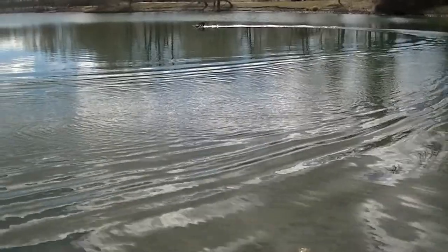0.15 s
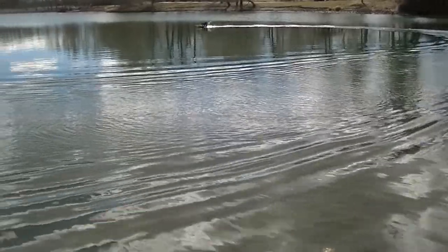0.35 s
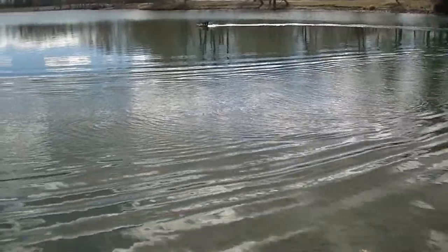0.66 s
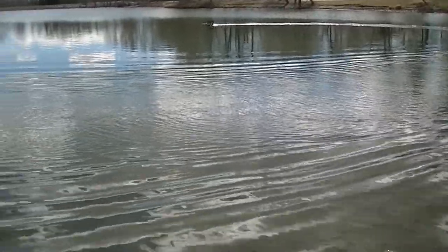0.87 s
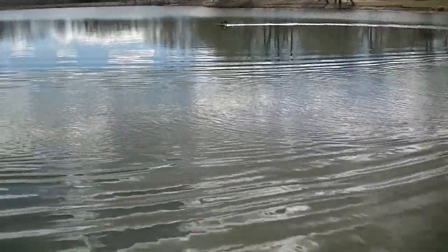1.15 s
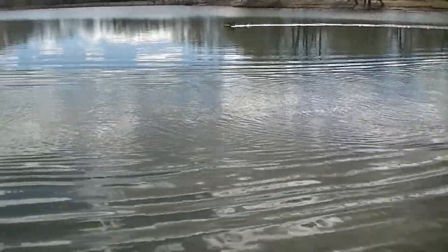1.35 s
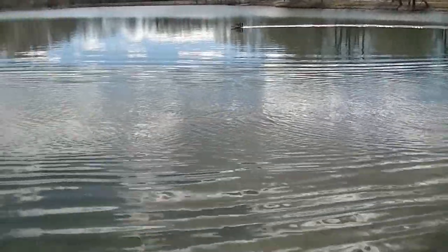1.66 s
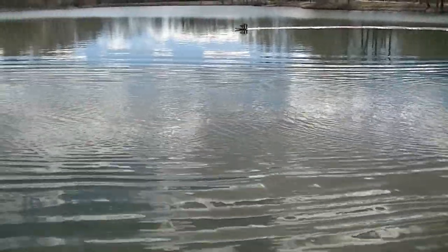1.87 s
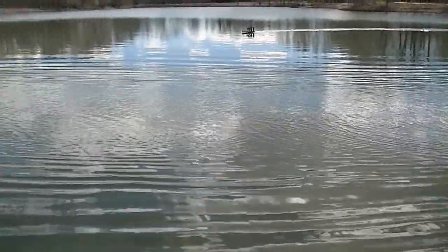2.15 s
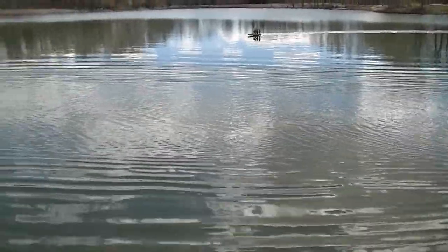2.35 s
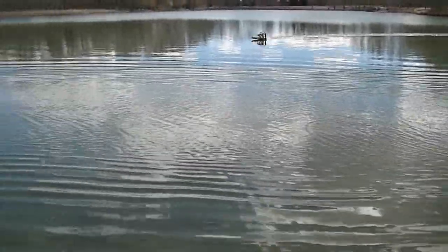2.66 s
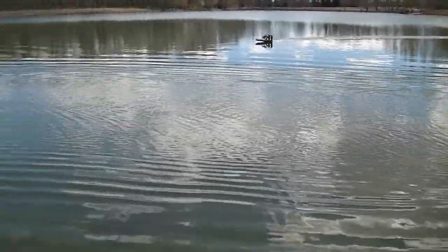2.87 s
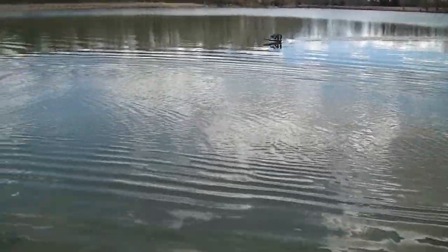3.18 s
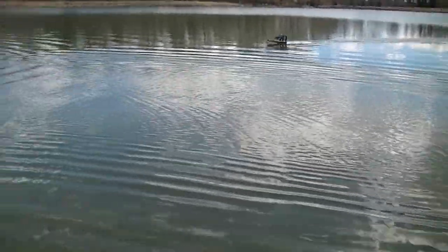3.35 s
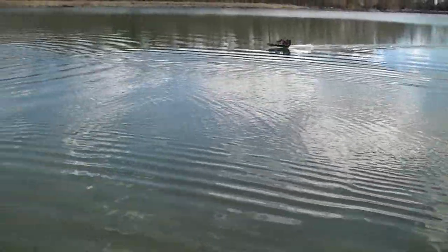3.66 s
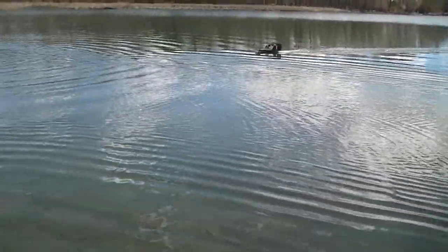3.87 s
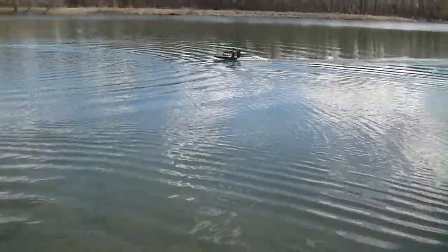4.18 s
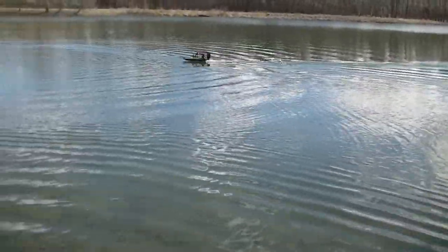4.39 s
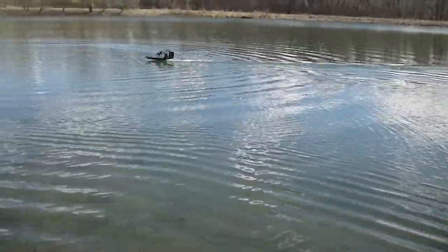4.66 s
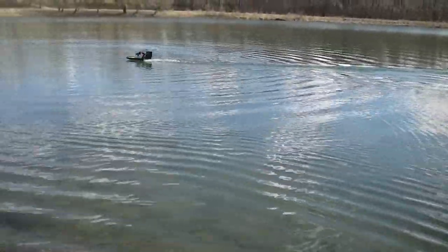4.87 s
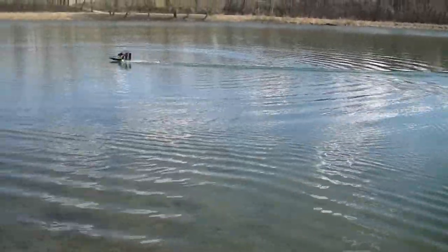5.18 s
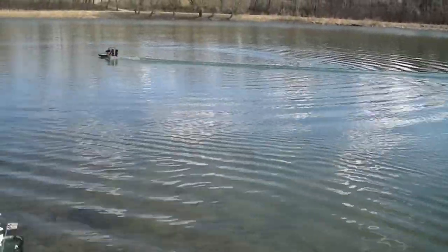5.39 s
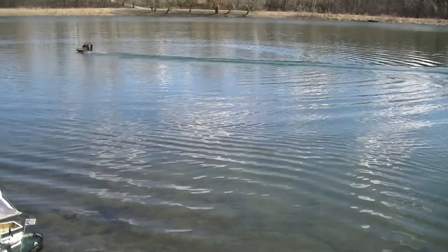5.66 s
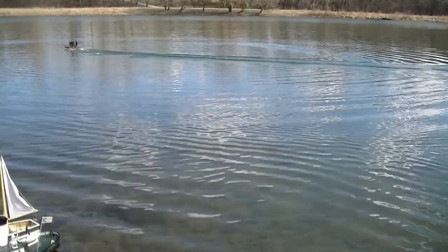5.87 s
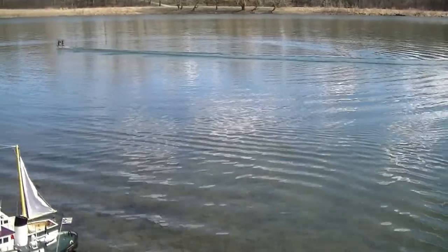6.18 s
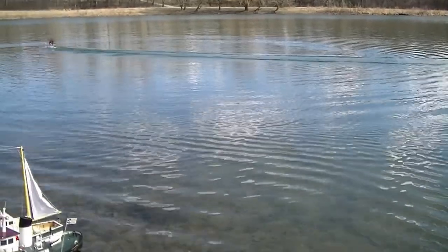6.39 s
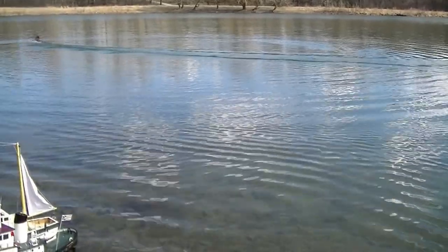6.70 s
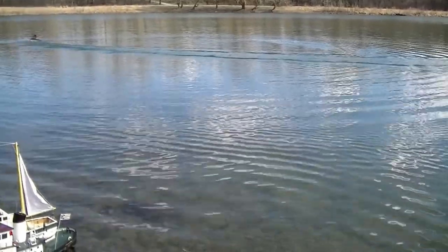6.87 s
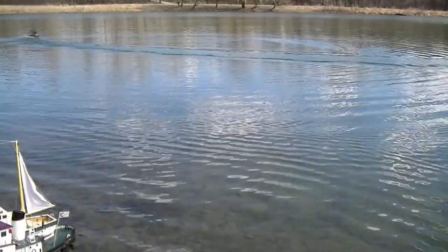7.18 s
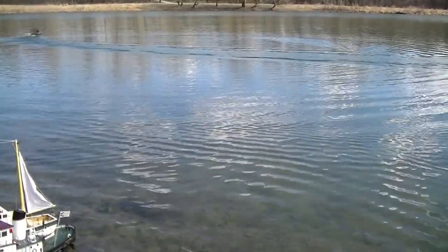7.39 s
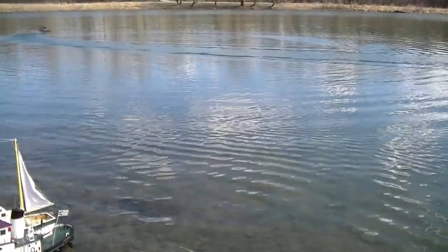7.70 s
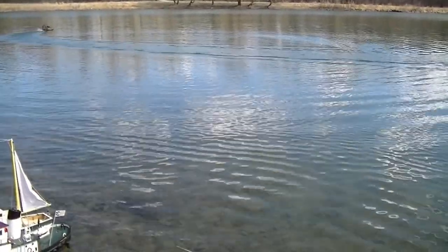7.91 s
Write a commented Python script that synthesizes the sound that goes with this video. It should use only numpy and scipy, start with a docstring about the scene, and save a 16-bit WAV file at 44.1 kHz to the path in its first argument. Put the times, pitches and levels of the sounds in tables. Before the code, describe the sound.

Raspy propeller buzz of a model airboat climbs, holds at full throttle, drops suddenly with watery slaps and ticks, then recedes across a quiet pond.

```python
"""Three-bladed air propeller of a small electric airboat circling a pond: blade tones, shaft orders, rush of air.
The boat speeds up, throttles back near the shore and runs away. Tones are drifting partials locked to the shaft.
Around them: magnet whine, the speed controller's whistle, spray as the hull slaps ripples, sharp water ticks.
Behind: low outdoor rumble and two raspy chirps. Heard by a narrow microphone pair.
"""
import sys
import numpy as np
from scipy import signal
from scipy.fft import rfft, irfft, next_fast_len
from scipy.io import wavfile
from scipy.ndimage import uniform_filter1d

SR = 44100
rng = np.random.default_rng(int(sys.argv[2]) if len(sys.argv) > 2 else 0)


def put_to_file(sound):
    """Save the sound as 16-bit audio at rate SR, in the file named by the first command-line argument."""
    columns = np.atleast_2d(sound).T  # one column per channel
    safe = np.clip(columns, -1, 1)
    whole_steps = np.round(safe * 32767)
    wavfile.write(sys.argv[1], SR, whole_steps.astype(np.int16))


N = 354563
TIME_S = np.arange(N) / SR
SLOW_STEP = 64  # samples between slow control points
SLOW_S = np.arange(0, N + 128, SLOW_STEP) / SR

BLADES, MAGNETS = 3, 14
FULL_THROTTLE_HZ, PART_THROTTLE_HZ = 184, 150  # shaft speeds
# Shaft speed. Each row: time in seconds, speed in Hz.
SHAFT_SPEED = [(0.0, 156.8), (0.6, 157.4), (0.82, 157.3), (1.0, 165.7), (1.23, 180.2), (1.39, 183.6),
               (1.66, 184.1), (2.44, 183.9), (2.87, 184.8), (3.58, 185.0), (3.608, 182.6), (3.638, 175.7),
               (3.712, 155.5), (3.822, 137.4), (3.894, 131.1), (4.0, 129.8), (4.12, 137.4), (4.21, 141.6),
               (4.34, 143.8), (4.45, 139.6), (4.63, 136.8), (4.95, 136.4), (5.1, 138.6), (5.31, 139.9),
               (5.6, 137.0), (6.05, 136.9), (6.63, 138.3), (7.48, 138.3), (7.8, 136.6), (8.04, 134.7)]
# Base levels at the shore as the boat turns. Each row: time in seconds, blade tones 1, 2, 3, 4, 8 and 11 in dB,
# shaking of the hull in dB.
BLADE_TONES = [(0.0, -43, -28, -44, -38.5, -51, -62, -39.5),
               (0.5, -44.5, -29, -34.5, -35.5, -52, -64, -39.5),
               (0.9, -41, -28.5, -34, -37.5, -43, -61, -38.5),
               (1.15, -36.5, -28, -29.5, -32, -39, -55, -44),
               (1.4, -31, -25.5, -25.5, -29.5, -46.5, -64, -36.5),
               (1.9, -34, -28.5, -27, -30.5, -44.5, -64, -32.5),
               (2.4, -33, -32, -24, -33.5, -46.5, -64, -33.5),
               (2.62, -32, -29, -28.5, -33, -44, -58, -31.5),
               (2.8, -34, -24.5, -35.5, -28, -44.5, -76, -30.5),
               (3.25, -32.5, -25, -33.5, -29.5, -46.5, -73, -33),
               (3.52, -35, -20.5, -34, -30.5, -47, -66, -30.5),
               (3.6, -33, -22.5, -32, -30, -40, -71, -29.5), (3.66, -33, -27, -40, -33, -57, -75, -40.5),
               (3.74, -31, -25.5, -41, -38, -43, -53, -28.5), (3.8, -42, -26, -35, -35.5, -49, -53, -49),
               (3.98, -41.5, -28, -37, -34, -52.5, -70, -52),
               (4.35, -39.5, -21.5, -36.5, -32, -51, -53, -48),
               (4.75, -42, -27.5, -32.5, -38.5, -47, -52, -48),
               (5.0, -39, -29.5, -27, -38.5, -48.5, -52.5, -50),
               (5.13, -37.5, -38, -31.5, -36.5, -44, -53.5, -44.5),
               (5.6, -44.5, -36, -30.5, -36.5, -42.5, -50, -46.5),
               (6.1, -48.5, -36, -34.5, -34, -43.5, -57, -50), (6.5, -48, -35.5, -42.5, -40, -50, -63, -48),
               (6.9, -53, -43.5, -44, -53, -54.5, -71, -57),
               (7.3, -48, -43, -44.5, -46.5, -56.5, -71, -47.5),
               (7.7, -47, -41, -38, -43.5, -49.5, -55, -51.5),
               (8.04, -49.5, -41.5, -40, -44.5, -51, -63, -59)]
# Offsets of blade tones 4 to 14 from the line through tones 4, 8 and 11, in dB.
UPPER_TONE_OFFSETS_DB = [0, 0, -0.5, 1.5, 2.5, 2, 6, 5.5, 1, -4, -3]
# Unequal blades and a shaking mount. Each row: shaft order, level in dB against the base of its order group
# (order 2, 4, 5, 7 or 10; from order 11 up, the rush of air).
SHAFT_ORDERS = [(1, -26), (2, -0.5), (4, -2.5), (5, 0.5), (7, -0.5), (8, -7.5), (10, 0), (11, -22.5),
                (13, -13.5), (14, -15.5), (16, -18.5), (17, -23), (19, -14.5), (20, -25), (22, -16.5),
                (23, -23), (25, -26.5), (26, -27), (29, -23.5), (31, -32), (32, -28), (34, -33), (35, -37),
                (37, -45)]
# Bases of shaft orders 2, 4, 5, 7 and 10 against the shaking. Each row: part throttle in dB, full throttle in dB.
SHAKE_BASES = [(-14, -9), (2, -0.5), (-3.5, -2), (-1, -1.5), (-9, -14.5)]
# Single partials stand out or sink. Each row: centre in seconds, shaft order, change in dB, half length in seconds.
GLINTS = [(.1, 10, 12, 0.67), (0.19, 6, -3.5, 0.068), (0.392, 6, 1, 0.049), (0.68, 9, 5, 0.071),
          (.77, 6, -3.5, 0.063), (0.97, 9, 5, 0.056), (6.3, 6, -3, 0.12), (6.5, 15, 4.5, .08),
          (8.5, 12, 3, .08), (6.9, 12, 8, 0.099), (7.286, 9, 5, 0.084), (0.81, 27, 5, 0.2),
          (0.75, 18, 5.5, 0.11), (1.38, 7, 6.5, 0.26), (2.2, 18, 5, 0.16), (2.63, 18, 4, 0.24),
          (3.17, 15, 4.5, 0.19), (3.54, 15, -7, .15), (2.43, 15, -1.5, .15), (2.84, 15, -1, .08),
          (3.04, 14, 8, 0.51), (2.63, 16, 11, .2), (3.1, 16, 8, .25), (3, 11, 11, .25),
          (3.29, 12, -7, 0.051), (3.8, 12, 4, .06), (2.95, 12, 5, 0.064), (1, 18, -1.5, 0.14),
          (1.13, 21, -2, .12), (1.65, 21, -7, 0.23), (1.2, 27, -10, .1), (2.4, 24, -7, .25),
          (0.45, 1, 5.5, 0.71), (3.76, 15, 6, .05), (3.7, 7, -6, .1), (3.78, 8, -6, .08), (3.76, 9, -4, .1),
          (4, 5, 4, .05), (3.75, 10, 3.5, .1), (3.3, 13, 4, .06), (4.27, 4, 6.5, .3), (4.4, 7, 7, 0.33),
          (5.1, 10, 12, 0.54), (5.7, 10, 2, .3), (2.43, 8, 3.5, 0.38), (7.1, 8, 8, 0.97), (7.7, 4, -8, .5),
          (6.06, 4, -6, 0.44), (3.1, 5, 2.5, .4), (1.7, 13, -5, .3), (8, 15, 1.5, .4), (4.3, 13, 9.5, 0.63),
          (3.1, 13, -1, 0.32), (2.3, 13, -13, 0.47), (1.7, 14, 9, .35), (6.3, 14, -12, 1.2),
          (3, 23, 5, 0.82), (2.6, 25, 8, .8), (2.5, 17, 4, .8), (4.7, 22, -6, 1.4), (.4, 19, -7, .5),
          (5.0, 19, -5, .5), (3.95, 24, 8, .15), (1.15, 24, -3, .2), (0.92, 30, -2, .25),
          (1.1, 33, -1, .25), (1.1, 36, -5, .25), (2.5, 30, -1, .25), (7.1, 30, -6, .55), (1.82, 29, 7, .1),
          (1.96, 27, 4, .2), (3, 7, -10, .07), (3, 4, -5, 0.027), (4, 5, -7, .02), (3.7, 4, 5.5, 0.035),
          (3.56, 9, -8, .04), (3.67, 10, 6, .06), (3.5, 15, 2.5, .06), (3.02, 12, -4, 0.49),
          (3.53, 10, 11.5, 0.16), (4.347, 15, 4.5, 0.1), (4.82, 24, 10, .07), (5.03, 24, 8, .12),
          (5.66, 24, 3, 0.17), (5.86, 24, -3, .06), (5.48, 12, 6, 0.31), (0.11, 15, 9, .1), (.13, 5, 1, .1),
          (2, 5, 1, .1), (3.273, 5, 4.5, 0.082), (5.525, 9, 3.5, 0.086), (6.034, 9, 5.5, 0.052),
          (4.973, 15, -18, 0.15), (5.2, 18, -8, 0.11), (5.18, 18, 6.5, 0.23), (5.76, 18, -3, 0.034),
          (5.76, 21, 0, 0.037), (4.71, 21, -6, .04), (4.7, 21, 4, .1), (5.14, 27, -7, .12),
          (6.7, 27, 4, .06), (5.52, 30, -7, .06), (5.76, 30, -9, .04), (5.4, 30, 8, 0.07),
          (3.8, 15, 1.5, 0.11), (6.04, 15, -5, .04), (5.3, 30, 5.5, 0.14), (5.643, 18, 9, 0.049),
          (5.622, 21, 7.5, 0.1), (5.888, 18, 9.5, 0.074), (5.9, 21, 3.5, 0.11), (5.9, 27, 5, .07),
          (6.047, 24, 2.5, 0.083), (6.17, 15, 1.5, 0.046), (6.742, 9, 8.5, 0.051), (6.4, 9, 4.5, 0.063),
          (7.15, 12, 5.5, 0.17), (7.648, 27, 7.5, 0.22), (6.6, 27, -7, .12), (6.56, 18, -9, 0.13),
          (7.85, 21, -2, .08), (6.2, 9, -6, .04), (5.8, 12, -8, .04), (7.43, 6, -6, .04),
          (6.73, 15, 3, .06), (7.44, 27, 8, .05)]
GLINT_STEEPNESS = 3
# Blade pulse points down from ahead of the propeller, up from behind. Each row: time in seconds, phase in radians.
FACING = [(0, 2.), (1.2, 1.), (3.8, 1.), (4.4, 2.2), (5.7, 4.), (6.8, 2.7), (8.04, 3.4)]
# Higher blade tones lead; every phase drifts slowly.
LEAD_RAD_PER_TONE_SQ, DRIFT_RAD, DRIFT_HZ = .3, .35, .6
# Slow level drift of partials as the hull rocks, before throttle and distance act on it.
FADE_DB, FADE_PER_ORDER_DB, FADE_TOP_DB, FADE_HZ = .2, .06, 2., 5
# Extra drift of the blade tones far off. Each row: time in seconds, added drift in dB.
FAR_FADE = [(5.9, 0), (6.4, 1.)]
# Upper tones weaken while the shaft changes speed: dB per blade tone above 4 at most, speed change that nears it.
BLUR_TOP_DB, BLUR_HZ_PER_S = .9, 40
SMEAR_PER_BLUR_DB = .7  # added share of blade-tone phase waver
CALM_SHARE = .2  # share of flutter that low partials lose at full throttle
WHINE_DB = -22.5  # magnet whine against the rush
# Whine swells as the motor surges. Each row: centre in seconds, level in dB, half length in seconds.
WHINE_SWELLS = [(4.33, -36, 0.15), (5.31, -40, 0.12), (6.9, -56, 0.27)]

# Hull bobs over ripples and the sound dips. Each row: centre in seconds, depth in dB before each sound's own share.
BOBS = [(.22, 3), (.53, 2.5), (.8, 2.5), (3.04, 0.5), (3.46, 1), (4.5, 0.5), (4.64, 1.5), (4.93, 0),
        (5.17, 1), (5.45, 3.5), (5.72, 1), (6.02, 1), (6.28, 2), (6.57, 2.5)]
# The shaking dips and the low rush puffs just after, by these shares of the depth.
BOB_HALF_S, BOB_LAG_S, BOB_SHAKE_SHARE, BOB_PUFF_SHARE = 0.049, 0.029, 2.1, 1.07

# Air through the propeller, base levels. Each row: time in seconds, middle range in dB, low range in dB, treble in dB.
RUSH_LEVELS = [(0.0, -34.5, -37.5, -53), (0.5, -33, -36.5, -52), (0.85, -33.5, -37.5, -48),
               (1.1, -35, -43, -46.5), (1.3, -31, -37.5, -44.5), (1.8, -30.5, -37, -46),
               (2.6, -31, -38.5, -42), (3.1, -29.5, -33.5, -41.5), (3.4, -31.5, -53, -40),
               (3.58, -31.5, -27, -43), (3.67, -38.5, -33, -47.5), (3.78, -38, -36, -49),
               (3.95, -40, -41, -52.5), (4.1, -34, -36, -50), (4.4, -36.5, -32.5, -47),
               (4.85, -33.5, -36, -44), (5.35, -31, -37, -43), (5.9, -32.5, -40, -45.5),
               (6.3, -36.5, -40, -48.5), (6.6, -39, -42, -55.5), (6.8, -43.5, -38.5, -69),
               (7.25, -42.5, -41, -70.5), (7.5, -39.5, -41, -52.5), (7.75, -39.5, -39, -51.5),
               (8.04, -40.5, -41.5, -54.5)]
# Spectrum of the rush, relative within each range. Each row: frequency in Hz, density in dB per Hz.
RUSH_COLOUR = [(100, -42), (200, -31), (300, -55), (420, -10.5), (700, -4.5), (1000, -5), (1250, -7),
               (1500, -9.5), (2000, -10.5), (3200, -10), (4500, -13.5), (6000, -21), (8000, -27),
               (11000, -30), (13000, -43), (14800, -49)]

# Switching whistle at part throttle. Each row: time in seconds, base level in dB.
WHISTLE_LEVEL = [(0, -65), (.15, -57), (.3, -70), (.9, -70), (1.2, -92), (3.6, -93), (3.66, -60),
                 (3.9, -52.5), (4.1, -55), (4.28, -58), (4.38, -55), (4.46, -67), (4.55, -58), (4.75, -49),
                 (4.86, -59), (4.96, -51), (5.06, -70), (5.2, -49), (5.42, -56), (5.5, -70), (5.63, -54),
                 (5.74, -66), (5.85, -52), (5.95, -57), (6.02, -72), (6.6, -65), (6.75, -86), (7.2, -78),
                 (7.4, -64), (8.04, -56)]
# Switching rate. Each row: time in seconds, frequency in Hz.
WHISTLE_PITCH = [(0, 8012), (1, 8030), (3.6, 8115), (3.9, 8078), (4.8, 7952), (5.4, 7903), (6.6, 7864),
                 (7.4, 7868), (8.04, 7890)]
# Side tone, heard while the boat is side-on. Each row: time in seconds, base level in dB.
SIDE_TONE_LEVEL = [(3.7, -95), (3.85, -72), (4.1, -66), (4.3, -64), (4.74, -69), (4.84, -95)]

# Hull slaps a ripple and throws spray. Each row: centre in seconds, rms level in dB before the bass cut,
# centre frequency in Hz, half length in seconds.
SLAPS = [(2.877, -23.5, 1250, 0.039), (2.912, -25.5, 870, 0.054), (3.103, -25.5, 1050, 0.057),
         (3.342, -24, 1030, 0.075), (3.615, -22, 1030, 0.064), (3.762, -27.5, 1180, 0.072),
         (4.029, -42.5, 4200, 0.024), (4.182, -28, 890, 0.044), (4.252, -28, 625, 0.037),
         (4.326, -27.5, 1550, 0.064), (4.595, -28, 2160, 0.032)]
# Sharp ticks of water on the hull. Each row: start in seconds, peak in dB before filtering, pitch in Hz,
# cycles (the swing peaks after half of them).
TICKS = [(3.80472, -6, 2200, .65), (3.80478, -22, 8000, .8), (3.8068, -24, 5000, 1.2),
         (3.8077, -19, 2200, 1), (4.092, -21, 4800, 1.5), (4.307, -26, 6000, 1.5), (4.5825, -18, 2000, 2.5),
         (4.5855, -32, 9500, 1.5), (4.587, -9.5, 2800, 1.2), (4.5972, -13, 2200, 2.4),
         (4.598, -32, 8500, 1.2), (4.6655, -23, 5000, .8), (4.7148, -18.5, 6000, .9)]
TICK_LOW_HZ, TICK_TOP_HZ = 350., 13500

# Quiet outdoor rumble, relative spectrum. Each row: frequency in Hz, density in dB per Hz.
POND_COLOUR = [(20, -25), (60, -20), (100, -17), (130, -5), (170, 2.5), (250, 7), (330, 14), (450, -5),
               (700, -29)]
POND_DB = -59
# Raspy chirps, perhaps a far bird. Each row: centre in seconds, level in dB before throb and fade,
# centre frequency in Hz, half length in seconds.
CHIRPS = [(7.69, -41, 2950, .045), (7.76, -42, 2950, .028)]
CHIRP_WIDTH_HZ, CHIRP_PULSE_HZ = 300, 85

# Boat position. Each row: time in seconds, left minus right in dB where the pan acts fully.
PAN = [(0.0, 2.5), (3.13, 2), (6.14, 3.5), (8.04, 3.5)]
# How far the pan acts. Each row: frequency in Hz, share of the pan.
PAN_SHARE = [(300, 0.), (900, 0.24), (1800, 0.83), (3600, 0.82), (7000, 1.), (8600, 0.13), (9200, 0.041)]
RECORDER_TOP_HZ = 14800


def propeller():
    """Blade-rate harmonics, weaker shaft orders from unequal blades, magnet whine; returns sound and shaft turns."""
    hz = curves(SHAFT_SPEED, SLOW_S)[0]
    jittered_hz = hz * (1 + wander((.0005, 8)))
    turns = np.cumsum(np.interp(TIME_S, SLOW_S, jittered_hz)) / SR
    throttle = np.clip((hz - PART_THROTTLE_HZ) / (FULL_THROTTLE_HZ - PART_THROTTLE_HZ), 0, 1)
    calm = 1 - CALM_SHARE * throttle
    speed_change = uniform_filter1d(abs(np.gradient(hz, SLOW_S)), size=40)
    blur_db = BLUR_TOP_DB * np.tanh(speed_change / BLUR_HZ_PER_S)
    facing = curves(FACING, SLOW_S)[0]
    dip_db = bobbing(SLOW_S)
    rush_db = curves(RUSH_LEVELS, SLOW_S)[0] - dip_db
    *tones_db, shake_db = curves(BLADE_TONES, SLOW_S)
    shake_db = shake_db - BOB_SHAKE_SHARE * bobbing(SLOW_S - BOB_LAG_S)
    out = blade_tones(turns, tones_db, dip_db, blur_db, calm, facing)
    out += shaft_orders(turns, shake_db, rush_db, blur_db, throttle, calm, facing)
    return out + magnet_whine(turns, rush_db), turns


def blade_tones(turns, tones_db, dip_db, blur_db, calm, facing):
    """Harmonics 1 to 14 of the blade rate; shorter waves flutter more."""
    *low_db, fourth_db, eighth_db, eleventh_db = tones_db
    waver = 1 + SMEAR_PER_BLUR_DB * blur_db
    far_db = curves(FAR_FADE, SLOW_S)[0]
    out = np.zeros(N)
    for k in range(1, 15):
        order = BLADES * k
        if k < 4:
            db = low_db[k - 1]
        else:
            # line through tones 4, 8 and 11; level beyond 11
            shares = [np.interp(k, [4, 8, 11], unit) for unit in np.eye(3)]
            line_db = shares[0] * fourth_db + shares[1] * eighth_db + shares[2] * eleventh_db
            db = line_db + UPPER_TONE_OFFSETS_DB[k - 4] - dip_db - (k - 4) * blur_db
        flutter_db = min(1.1 + .15 * k, 2.1) * (calm if k < 6 else 1)
        smear_rad = (.11 + .022 * k) * waver
        fade_db = order_fade_db(order) * calm + far_db
        lag_rad = facing + LEAD_RAD_PER_TONE_SQ * k ** 2 / 2
        out += tone(order * turns, db + glint(order), flutter_db, smear_rad, 28, fade_db, lag_rad)
    return out


def shaft_orders(turns, shake_db, rush_db, blur_db, throttle, calm, facing):
    """Low orders shake the hull, fitfully at part throttle; high orders ride with the rush of air."""
    bases_db = [shake_db + part + (full - part) * throttle for part, full in SHAKE_BASES] + [rush_db]
    out = np.zeros(N)
    for order, order_db in SHAFT_ORDERS:
        base_db = bases_db[np.searchsorted([3, 5, 6, 9, 11], order, "right")]
        k = order / BLADES
        db = base_db + order_db + glint(order) - max(k - 4, 0) * blur_db
        flutter_db = min(1.2 + .12 * order, 3) * calm
        smear_rad = (.2 + .02 * order) * calm
        fade_db = order_fade_db(order) + 1.2 * (1 - throttle)
        lag_rad = facing + LEAD_RAD_PER_TONE_SQ * k ** 2 / 2 + rng.normal(0, 1.2)
        out += tone(order * turns, db, flutter_db, smear_rad, 18, fade_db, lag_rad)
    return out


def magnet_whine(turns, rush_db):
    """Motor whine, two cycles per magnet per turn; follows the rush and swells with surges."""
    level = gain_of(rush_db + WHINE_DB)
    for s, db, half_s in WHINE_SWELLS:
        level = level + gain_of(db) * np.exp(-((SLOW_S - s) / half_s) ** 4)
    return tone(2 * MAGNETS * turns, 20 * np.log10(level), 1.5, .3, 20)


def order_fade_db(order):
    """Slow-drift depth, growing with shaft order up to a limit."""
    return min(FADE_DB + FADE_PER_ORDER_DB * order, FADE_TOP_DB)


def glint(order):
    """Passing level changes of one shaft order, in dB."""
    return sum(db * np.exp(-abs((SLOW_S - s) / half_s) ** GLINT_STEEPNESS)
               for s, k, db, half_s in GLINTS if k == order)


def bobbing(t):
    """Depth in dB of the dips over ripples at times t."""
    return sum(db * np.exp(-((t - s) / BOB_HALF_S) ** 2) for s, db in BOBS)


def rush(turns):
    """Turbulent air in three ranges, chopped as blades pass the struts and, less, once per turn."""
    hz = np.fft.rfftfreq(512, 1 / SR)[:, None]
    t = np.arange(N // 128 + 5) * 128 / SR
    middle_db, low_db, treble_db = curves(RUSH_LEVELS, t)
    low = 1 / (1 + (hz / 1400) ** 6)
    high = 1 / (1 + (5000 / (hz + 1)) ** 6)
    colour = gain_of(2 * read(RUSH_COLOUR, hz))  # power
    low_part, middle_part, treble_part = [share * colour / np.sum(share * colour)
                                          for share in (low, (1 - low) * (1 - high), high)]
    gusts_db = np.interp(t, SLOW_S, wander((.5, 5.4)))
    puffs_db = np.interp(t, SLOW_S, wander((1.2, 5.))) + BOB_PUFF_SHARE * bobbing(t - BOB_LAG_S)
    dip_db = bobbing(t)
    # doubled dB gives power
    power = low_part * gain_of(2 * (low_db + puffs_db))
    power = power + middle_part * gain_of(2 * (middle_db + 1.9 * gusts_db - 1.3 * dip_db))
    power = power + treble_part * gain_of(2 * (treble_db + gusts_db - dip_db))
    air = shaped_noise(10 * np.log10(power), hz, t, patchy_db=1.)
    return air * (1 + .17 * np.cos(2 * np.pi * BLADES * turns) + .07 * np.cos(2 * np.pi * turns))


def controller(turns):
    """Speed controller's switching whistle, with a side tone one magnet rate above."""
    switching = np.cumsum(curves(WHISTLE_PITCH, TIME_S)[0]) / SR
    whistle_db = curves(WHISTLE_LEVEL, SLOW_S)[0] - bobbing(SLOW_S)
    whistle = tone(switching, whistle_db, 2., .3, 25, fade_db=2.)
    side_tone = tone(switching + MAGNETS * turns, curves(SIDE_TONE_LEVEL, SLOW_S)[0], 4., .7, 15)
    return whistle + side_tone


def slaps():
    """Hull on ripples: short grainy bursts of band-passed spray noise."""
    out = np.zeros(N + SR)
    for s, db, hz, half_s in SLAPS:
        t = np.arange(-half_s, half_s, 1 / SR)
        grain_db = np.interp(t + half_s, SLOW_S, wander((2.5, 200)))
        spray = band_noise(hz / 1.78, hz * 1.74, len(t), gain_of(grain_db))
        add_at(out, s - half_s, gain_of(db) * spray * np.cos(np.pi / 2 * t / half_s) ** 2)
    return out[:N]


def ticks():
    """Water on the hull: brief swings that swell and die within a few cycles."""
    out, t = np.zeros(N), np.arange(400) / SR
    for s, db, hz, cycles in TICKS:
        u = 2 * hz * t / cycles
        swing = -np.sin(2 * np.pi * hz * t) * u * np.exp(-u)
        add_at(out, s, gain_of(db) * swing / abs(swing).max())
    return coloured(out, lambda f: f ** 6 / (f ** 6 + TICK_LOW_HZ ** 6) / (1 + (f / TICK_TOP_HZ) ** 6))


def pond():
    """Low steady rumble of the open air: coloured noise, slightly different at each capsule."""
    noise = rng.standard_normal((2, N))
    mid, side = evened(coloured(noise, lambda hz: gain_of(read(POND_COLOUR, hz))))
    return gain_of(POND_DB) * np.array([mid + .09 * side, mid - .09 * side])


def chirps():
    """Narrow-band noise, throbbing fast into a rasp."""
    out = np.zeros(N)
    for s, db, hz, half_s in CHIRPS:
        t = np.arange(-half_s, half_s, 1 / SR)
        rasp = band_noise(hz - CHIRP_WIDTH_HZ / 2, hz + CHIRP_WIDTH_HZ / 2, len(t))
        throb = 1 + .7 * np.cos(2 * np.pi * CHIRP_PULSE_HZ * t)
        add_at(out, s - half_s, gain_of(db) * rasp * throb * np.cos(np.pi / 2 * t / half_s))
    return out


def tone(turns, db, flutter_db, smear_rad, flutter_hz, fade_db=0., lag_rad=0.):
    """One partial at an rms level in dB; eddies on the way make level and phase flutter."""
    level = np.sqrt(2) * gain_of(db + wander((flutter_db, flutter_hz), (fade_db, FADE_HZ)))
    shift_rad = lag_rad + wander((smear_rad, flutter_hz), (DRIFT_RAD, DRIFT_HZ))
    return -np.interp(TIME_S, SLOW_S, level) * np.cos(2 * np.pi * turns + np.interp(TIME_S, SLOW_S, shift_rad))


def wander(*parts):
    """Smooth chance at the slow times: sum of low-passed noises, each (rms depth, cutoff in Hz)."""
    total = 0
    for depth, rate_hz in parts:
        b, a = signal.butter(N=2, Wn=rate_hz, fs=SR / SLOW_STEP)
        total = total + depth * evened(signal.lfilter(b, a, rng.standard_normal(len(SLOW_S))))
    return total


def shaped_noise(field_db, hz, t, patchy_db):
    """Random short-time spectra under a dB field, with drifting patches."""
    real, imag, patches = rng.standard_normal((len(t), len(hz), 3)).T
    patches = uniform_filter1d(patches, size=10, axis=0)
    patches = evened(uniform_filter1d(patches, size=16, axis=1))
    spectra = (real + 1j * imag) * gain_of(field_db + patchy_db * patches)
    return signal.istft(spectra, nperseg=512, noverlap=384)[1][:N] * np.sqrt(1.5)


def band_noise(low_hz, high_hz, size, grain=1.):
    """Band-passed white noise of rms 1; grain scales the noise before the filter."""
    band = signal.butter(N=2, Wn=[low_hz, high_hz], btype="band", fs=SR, output="sos")
    return evened(signal.sosfilt(band, rng.standard_normal(size) * grain))


def coloured(x, gain):
    """Filters x by gain(Hz), zero phase."""
    size = next_fast_len(N)
    return irfft(rfft(x, size) * gain(np.fft.rfftfreq(size, 1 / SR)), size)[..., :N]


def add_at(out, start_s, sound):
    """Mixes a short sound into out."""
    out[round(start_s * SR):][:len(sound)] += sound


def gain_of(db):
    """Decibels to amplitude."""
    return 10 ** (np.asarray(db) / 20)


def evened(x):
    """Scales to rms 1."""
    return x / np.sqrt(np.mean(x ** 2) + 1e-20)


def read(points, hz):
    """Reads a spectrum on a log-frequency axis."""
    f, value = np.transpose(points)
    return np.interp(np.log(hz + 1), np.log(f + 1), value)


def curves(rows, t):
    """All columns of a table at times t."""
    s, *columns = np.transpose(rows)
    return [np.interp(t, s, c) for c in columns]


def scene():
    """Boat reaches both capsules together, panned by level mainly in the middle and upper range; then background."""
    tones, turns = propeller()
    # deep bass is cut from the rush of air and the spray, not from the tones
    no_bass = signal.butter(N=6, Wn=340, btype="high", fs=SR, output="sos")
    noise = signal.sosfilt(no_bass, rush(turns) + slaps())
    boat = tones + noise + controller(turns) + ticks()
    pannable = coloured(boat, lambda hz: read(PAN_SHARE, hz))
    side = np.tanh(curves(PAN, TIME_S)[0] * np.log(10) / 40) * pannable  # dB difference to side share
    return np.array([boat + side, boat - side]) + pond() + chirps()


def record(dry):
    """Band limit of the recorder."""
    low_pass = signal.firwin(511, RECORDER_TOP_HZ, window=("kaiser", 9), fs=SR)
    return signal.oaconvolve(dry, low_pass[None], "same")


dry = scene()
out = record(dry)
put_to_file(out)
```